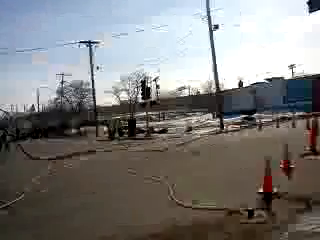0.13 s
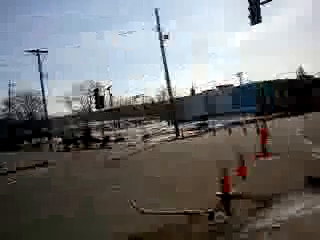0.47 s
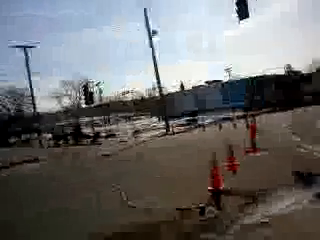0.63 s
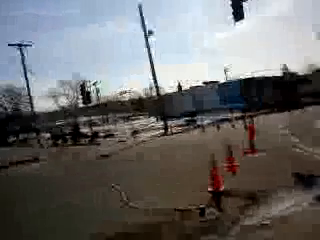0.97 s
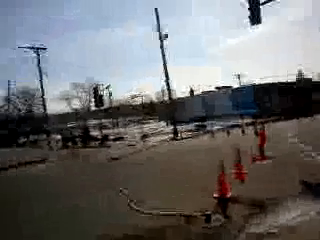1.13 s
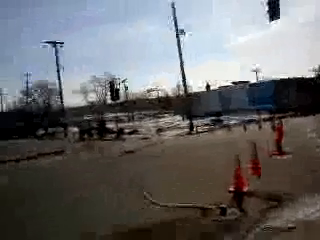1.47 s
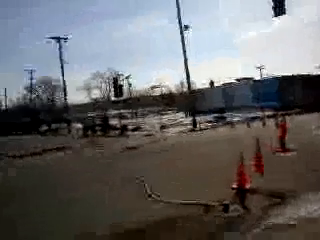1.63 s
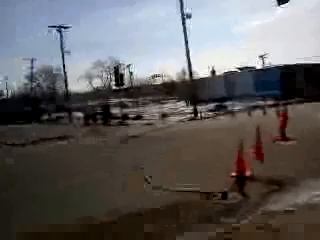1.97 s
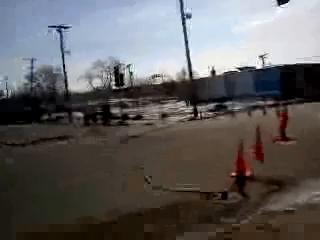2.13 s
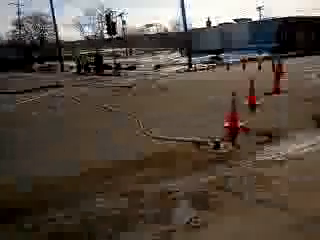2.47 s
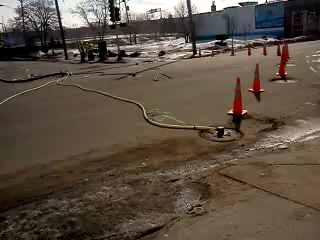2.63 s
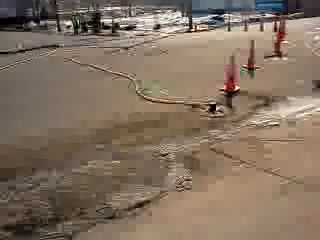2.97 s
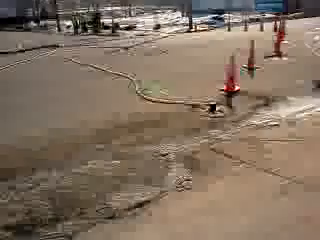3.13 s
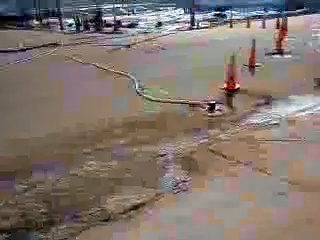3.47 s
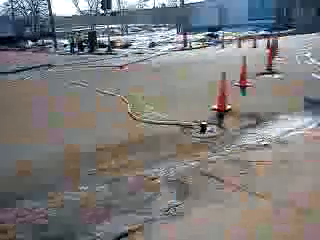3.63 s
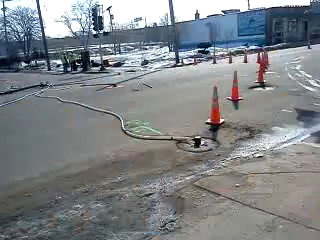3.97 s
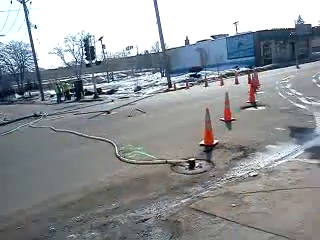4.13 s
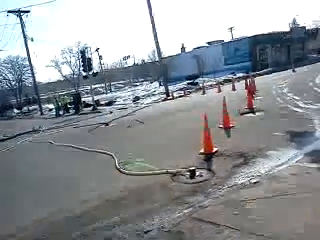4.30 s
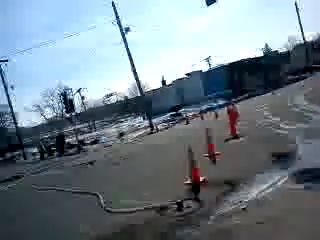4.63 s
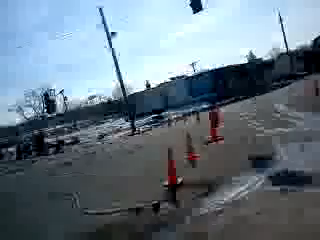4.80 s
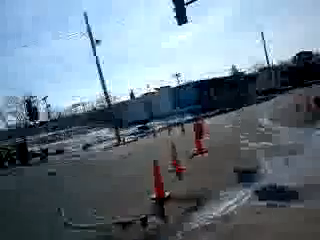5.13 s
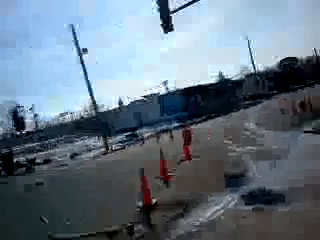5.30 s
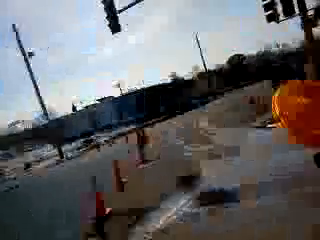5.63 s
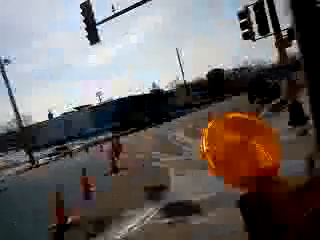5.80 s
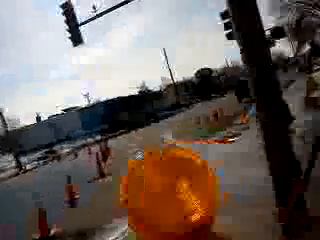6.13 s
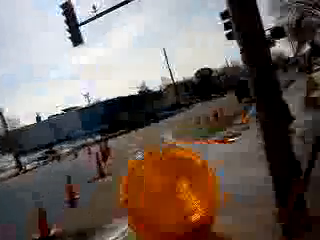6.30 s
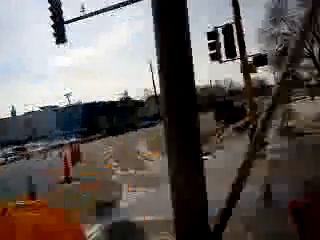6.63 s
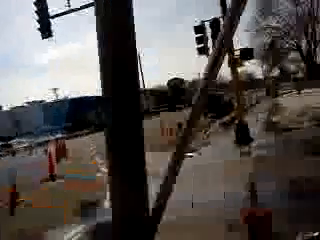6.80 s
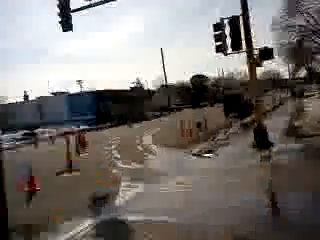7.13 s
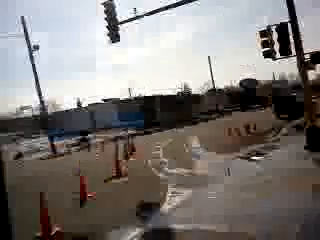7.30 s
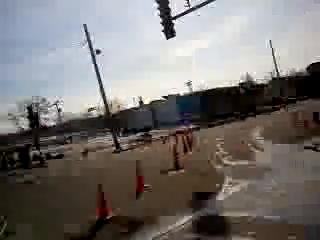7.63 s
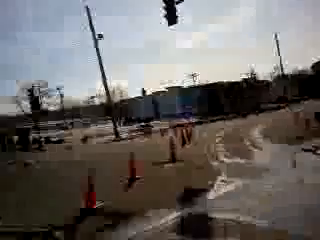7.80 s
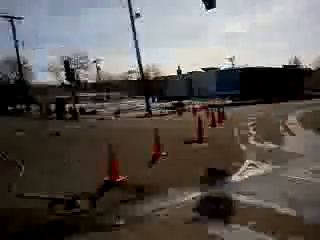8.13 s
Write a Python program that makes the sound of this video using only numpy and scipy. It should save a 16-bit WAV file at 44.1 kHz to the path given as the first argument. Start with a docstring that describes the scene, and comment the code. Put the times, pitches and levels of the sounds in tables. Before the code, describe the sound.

Loud, buzzing hollow drone of a vacuum blower across a street, wrapped in rushing air, quick engine pops, wind gusts and two dull thumps.

```python
"""A lobe blower on a truck drones across a street, over roaring air, a puttering engine and buffeting wind.
Lobe pulses give a harmonic stack of sines; shaft and gears add weaker sines locked to the same rotation.
Filtered noise makes the roar, hiss and wind; short tone bursts make the engine pops and two dull thumps.
The hand-held microphone swings round slowly, so levels follow its direction and the street echoes.
The small recorder is narrow-band and overloads on the highest peaks."""
import sys
import numpy as np
from scipy import signal
from scipy.fft import rfft, irfft
from scipy.io import wavfile

SR = 44100
rng = np.random.default_rng(int(sys.argv[2]) if len(sys.argv) > 2 else 0)


def unload_wav(signal):
    """Save mono or channel-first audio to the path in sys.argv[1] as 16-bit WAV at rate SR, clipped to [-1, 1]."""
    wavfile.write(
        sys.argv[1],
        SR,
        np.round(np.clip(np.atleast_2d(signal).T, -1, 1) * 32767).astype(np.int16),
    )


N = 364707

# moments when the lobe tones break up and a thump sounds: start_s (centre), jolt_turns, thump_level_db
BREAKS = [(6.749, .2, -8.5), (7.148, .2, -15)]


def from_db(db):
    """Logarithmic level: the amplitude gain of a level in dB."""
    return 10 ** (np.asarray(db) / 20)


def rms_one(x):
    """Normalisation: the signal scaled to an rms of 1."""
    return x / np.sqrt(np.mean(x ** 2) + 1e-20)


def in_time(rows):
    """Linear interpolation: each column of a curve table as one value a sample."""
    seconds, *columns = np.transpose(rows)
    return [np.interp(np.arange(N) / SR, seconds, column) for column in columns]


def bumps(rows):
    """Superposition of bell-shaped swells, each given as centre_s, half_length_s, height."""
    t = np.arange(N) / SR
    return sum(height * np.exp(-((t - centre) / half) ** 2) for centre, half, height in rows)


def drift(rate_hz):
    """Low-pass random process of rms 1: noise at every 40th sample through two equal poles."""
    pole = np.exp(-2 * np.pi * rate_hz * 40 / SR)
    noise = rng.standard_normal(N // 40 + 2002)
    slow = signal.lfilter([1], [1, -2 * pole, pole * pole], noise)[2000:]   # drop the settling time
    return np.interp(np.arange(N) / 40, np.arange(len(slow)), rms_one(slow))


def tone(turns, level_db, waver_db):
    """Amplitude modulation: a sine whose rms level wavers with the air between truck and microphone."""
    amplitude = np.sqrt(2) * from_db(level_db + waver_db * drift(3.5))
    return amplitude * np.cos(2 * np.pi * turns)


def break_window(centre_s):
    """Flat-topped gate: near 1 during a break, near 0 elsewhere."""
    half_s = .012
    return np.exp(-((np.arange(N) / SR - centre_s) / half_s) ** 4)


def break_up():
    """Phase modulation in turns: a jump ahead and back at each break, varied by chance at every call."""
    jolt = sum(turns * break_window(s) for s, turns, db in BREAKS)
    return jolt * (1 + .5 * drift(36.0))


def lobe_levels(away):
    """Interference: echoes cancel or reinforce single lobe tones; returns level_db by multiple."""
    # the two loudest lobe tones as the microphone swings: time_s, main_level_db, octave_level_db
    drone = [(0.0, -15.5, -11), (0.37, -15.5, -18.5), (1.59, -15, -21.5), (2.99, -16, -22.5),
             (3.31, -17, -16.5), (4.1, -16, -15), (4.54, -14.5, -18.5), (4.81, -13.5, -16.5),
             (5.57, -12.5, -14.5), (5.87, -14, -19.5), (6.63, -14.5, -16.5), (6.86, -15, -21),
             (7.21, -18.5, -20), (7.51, -16, -27), (7.83, -15, -22), (7.97, -16.5, -27),
             (8.15, -17.5, -17.5), (8.27, -12.5, -24)]
    # weaker lobe tones, as multiples of the main pitch
    side_multiples = [1.5, 2.5, 3, 3.5, 4.5]
    # one row for each of them: level_db, change_facing_away_db
    side_lobes = [(-29, -0.5), (-26, -1.5), (-20.5, -12), (-26, -4), (-33.5, -3)]
    # street echoes, one list for each of them: centre_s, half_length_s, change_db
    interference = [
        [(0.0, 0.44, -3.5), (3.05, 0.34, -13.5), (5.85, 0.2, 4), (7.3, 0.33, 4)],
        [(.7, 0.23, -6.5), (3.0, 1, 5), (4.0, 0.77, 4.5), (5.9, 0.28, -4), (8.0, 0.42, 4.5)],
        [(0.0, 0.13, -4), (1.9, 0.36, 1.5), (4.1, .3, 1.5), (7.3, 0.18, -4)],
        [(0.0, 0.12, -13), (3.85, 0.22, -4), (5.05, 0.2, -2.5), (5.5, 0.13, 4), (7.25, .2, -6)],
        [(.8, 0.94, 6), (3.0, .4, -0.5), (4.6, 0.3, 2.5), (5.9, .3, 4.5), (7.2, 0.67, -2)],
    ]
    levels = dict(zip([1, 2], in_time(drone)))
    for multiple, (db, away_db), rows in zip(side_multiples, side_lobes, interference):
        levels[multiple] = db + away_db * away + bumps(rows)
    return levels


def lobe_tones(main_turns, levels):
    """Dispersion: lobe tones leave as one pulse that the pipework spreads, the higher tones lagging."""
    # shift of the overtones by street echoes as the microphone moves: time_s, lag_turns
    overtone_lag = [(0, -.06), (.9, .04), (2.4, 0), (2.9, -.14), (4.4, -.1), (5.2, .1), (6.8, .25),
                    (8.27, .28)]
    lag_per_tone, lag_past_resonance = .17, .43   # turns per half multiple, the second past the pipe resonance
    dip_share = .4   # loss of amplitude in a break
    (echo_lag,) = in_time(overtone_lag)
    out = 0
    for multiple, level_db in levels.items():
        behind = lag_per_tone * max(2 * multiple - 3, 0)
        behind += lag_past_resonance * np.clip(2 * multiple - 5, 0, 2)
        behind = behind + echo_lag * (multiple > 1)
        out = out + tone(multiple * main_turns - behind + break_up(), level_db, waver_db=0.5)
    return out * (1 - dip_share * sum(break_window(s) for s, turns, db in BREAKS))


def shaft_lines(shaft_turns, orders, levels_db, waver_db):
    """Order-locked lines: sines at fixed multiples of the shaft speed, each starting at a random phase."""
    return sum(tone(order * shaft_turns + rng.random(), db, waver_db)
               for order, db in zip(orders, levels_db))


def blower(away):
    """Rotating-machine harmonics: lobe, shaft and gear tones all follow one shaft speed."""
    # pitch of the main lobe tone: time_s, pitch_hz
    speed = [(0.1, 372.7), (0.5, 373.2), (1.1, 373.6), (1.5, 373.35), (2.3, 373.2), (2.72, 375.1),
             (3.0, 375.05), (3.35, 374.6), (3.7, 373.5), (4.15, 372.9), (5.8, 372.75), (6.1, 372.5),
             (7.1, 372.35), (8.2, 372.8)]
    # lines beside the tone at 36 times shaft speed, from once-a-turn unevenness: shaft_multiple
    beside_orders = [37, 38]
    # their levels against that tone: level_db
    beside_db = [-9, -18]
    # weaker lines locked to the shaft: shaft_multiple
    shaft_orders = [6, 7, 8.5, 9, 10.5, 15, 48, 60, 61, 63, 66, 69, 72, 74, 75, 76, 78, 84, 87, 90, 93, 96,
                    102, 126, 129]
    # their levels before shading: level_db
    shaft_db = [-37, -39, -40, -31, -35, -39, -45, -39, -45, -44, -41, -45, -38, -39, -38, -45, -46, -43,
                -43, -42, -47, -47, -48, -51, -51]
    # gear whine near the casing resonance: shaft_multiple
    gear_orders = [50.5, 51.82, 52.88, 57, 58]
    # their levels against the whine curve: level_db
    gear_db = [-15, -11, 0, -11, -3]
    # level of the gear whine: time_s, level_db
    whine = [(0, -27.5), (1.55, -26.5), (2.45, -31.5), (3.05, -36.5), (3.5, -31.5), (4.55, -29), (5.8, -28),
             (6.4, -44.5), (7.2, -41), (7.55, -35), (7.85, -34.5), (8.27, -34)]
    (main_hz,), (whine_db,) = in_time(speed), in_time(whine)
    main_turns = np.cumsum(main_hz) / SR
    shaft_turns = main_turns / 12   # the main tone is at twelve times the shaft speed
    levels = lobe_levels(away)
    shading_db = -4 * (away - .3)   # shaft lines are shaded facing away
    out = lobe_tones(main_turns, levels)
    out += shaft_lines(shaft_turns, beside_orders, [levels[3] + db for db in beside_db], waver_db=1.0)
    out += shaft_lines(shaft_turns, shaft_orders, [db + shading_db for db in shaft_db], waver_db=2.0)
    return out + shaft_lines(shaft_turns, gear_orders, [whine_db + db for db in gear_db], waver_db=1.0)


def roar(levels):
    """Turbulence noise: one coloured noise split into overlapping ranges that swell apart."""
    # colour of the roar: frequency_hz, density_db (per Hz)
    colour = np.array([(60, -20), (150, -5), (300, 0), (420, -1), (650, -4), (1150, -5), (1450, -8),
                       (2000, -8), (3000, -9), (3550, -11.5), (3700, -13), (4640, -15), (4740, -19),
                       (5400, -19.5)])
    # casing resonances lifting the roar: frequency_hz, width_hz, lift_db
    casing = [(1704, 100, 2.5), (2315, 250, 4), (2820, 120, 3)]
    # ranges in which the level is set: low_hz, high_hz
    ranges_hz = [(160, 520), (580, 1280), (1350, 1950), (1950, 3000), (3050, 3600), (3700, 4650)]
    hz = np.fft.rfftfreq(N, 1 / SR) + 1   # +1 keeps the logarithm finite
    colour_db = np.interp(np.log(hz), np.log(colour[:, 0]), colour[:, 1])
    for peak_hz, width_hz, lift_db in casing:
        colour_db = colour_db + lift_db / (1 + (2 * (hz - peak_hz) / width_hz) ** 2)
    spectrum = rfft(rng.standard_normal(N)) * from_db(colour_db)
    out = 0
    for (low, high), level_db, row in zip(ranges_hz, levels, np.eye(len(levels))):
        share = np.interp(hz, np.mean(ranges_hz, axis=1), row)   # triangular crossfade to the neighbours
        inside = spectrum[(hz > low) & (hz < high)]
        range_rms = np.sqrt(2 * np.sum(abs(inside) ** 2)) / N
        out = out + from_db(level_db + 0.61 * drift(4.0)) * irfft(spectrum * share, N) / range_rms
    return out


def putter():
    """Periodic impulse excitation: each engine firing is a short hollow pop of two tones a fifth apart."""
    # the pops before chance: time_s, peak_level_db (of the upper tone), pitch_hz
    pops = [(0, -32, 700), (2.3, -30, 650), (2.65, -22, 680), (2.85, -20, 830), (3.55, -22, 840),
            (3.8, -27, 620), (4.05, -20.5, 620), (4.67, -20, 660), (4.74, -18.5, 850), (4.9, -19, 860),
            (5.0, -21, 1000), (5.9, -22, 1010), (6.1, -23, 1230), (6.4, -25, 1220), (6.55, -28, 1450),
            (7.1, -28, 1550), (8.27, -36, 1600)]
    first_s, period_s, half_s = .1055, .07858, .006
    level_spread_db, pitch_spread = 2, .04   # the second as a share of the pitch
    db, hz = in_time(pops)
    span = np.arange(-800, 800)
    envelope = np.exp(-(span / SR / half_s) ** 2)
    out = np.zeros(N + 1600)   # 800 samples of margin at both ends
    starts = (np.arange(first_s, N / SR, period_s) * SR).astype(int)
    for i in starts:
        pitch_chance, upper_phase, lower_phase, level_chance = rng.standard_normal(4)
        turns = hz[i] * (1 + pitch_spread * pitch_chance) * span / SR
        pop = np.cos(2 * np.pi * (turns + upper_phase))
        pop += 0.6 * np.cos(2 * np.pi * (.66 * turns + lower_phase))   # weaker, about a fifth below
        out[i + 800 + span] += from_db(db[i] + level_spread_db * level_chance) * envelope * pop
    return out[800:N + 800]


def break_thump():
    """Modal superposition: a dull thump at each break from three short soft tones in quick succession."""
    # tones of a thump: pitch_hz, level_db, delay_s (after the break)
    thump_modes = [(410, 0, -.007), (1030, -3.5, .001), (760, 0, .007)]
    t, out = np.arange(N) / SR, 0
    for s, turns, db in BREAKS:
        for hz, mode_db, late_s in thump_modes:
            swell = np.exp(-((t - s - late_s) / .005) ** 2)
            out = out + from_db(db + mode_db) * swell * np.cos(2 * np.pi * (hz * t + rng.random()))
    return out


def band_noise(order, low_hz, high_hz):
    """Band-pass filtering: white noise narrowed to a band and scaled to rms 1."""
    sos = signal.butter(order, [low_hz, high_hz], "band", fs=SR, output="sos")
    return rms_one(signal.sosfilt(sos, rng.standard_normal(N)))


def wind():
    """Pressure fluctuation at the microphone: lumpy low noise, with harder buffets that reach higher."""
    # strength of the breeze before its lumps: time_s, level_db
    breeze = [(0, -39.5), (1.0, -39.5), (1.9, -36.5), (2.6, -32.5), (4.2, -36), (4.9, -31), (5.25, -28.5),
              (5.5, -40), (7.3, -43), (8.27, -39.5)]
    # single buffets: centre_s, half_length_s, lift_db (above the breeze)
    buffets = [(.48, 0.063, 9.5), (2.16, 0.086, 4), (2.37, 0.049, 2), (2.88, .05, 7), (3.2, 0.042, 5),
               (3.5, .05, 7), (4.37, .04, 11), (4.64, .03, 5.5), (4.79, 0.035, 6), (5.045, .01, 6),
               (5.12, .01, 2), (5.21, .01, 2.5), (6.96, .04, 7), (7.14, .04, 12), (7.5, 0.022, 6),
               (7.8, 0.073, 3)]
    level_db = in_time(breeze)[0] + 3.1 * drift(7.7)
    buffet_db = bumps(buffets)
    low = from_db(level_db + buffet_db) * band_noise(1, 40, 180)
    # the brighter part is weaker but grows faster in a buffet
    top = from_db(level_db - 6.5 + 1.4 * buffet_db) * band_noise(1, 150, 420)
    return low + top


def other_machines():
    """Harmonic series: a second machine's thin hum further off, and a low engine note, both at fixed pitch."""
    # level of the hum: time_s, level_db
    hum_curve = [(0, -50), (4.4, -50), (5.0, -34.5), (6.5, -38.5), (8.27, -29.5)]
    # its partials 1, 2, 3 ... against that level: level_db
    hum_partials_db = [-2, -5.5, -11.5, -7.5, -9, -4]
    # the idling engine: pitch_hz, level_db
    idle_lines = [(72.7, -49), (145.4, -43), (218, -49), (264, -46.5)]
    hum_hz = 473.6
    t, (hum_db,) = np.arange(N) / SR, in_time(hum_curve)
    hum = sum(tone(k * hum_hz * t + rng.random(), hum_db + db, waver_db=2.0)
              for k, db in enumerate(hum_partials_db, start=1))
    idle = sum(tone(hz * t + rng.random(), db, waver_db=1.5) for hz, db in idle_lines)
    return hum + idle


def hiss_patches():
    """Gated band noise: the hiss swells briefly in narrow bands that fade in and out."""
    # the patches: centre_s, half_length_s, frequency_hz, level_db
    patches = [(.2, .15, 3500, -38), (0.943, 0.23, 3200, -34), (4.2, .15, 3260, -38.5),
               (4.881, 0.17, 3780, -33), (6.097, 0.16, 4500, -35), (6.952, 0.22, 2880, -37),
               (7.78, 0.15, 3360, -31.5)]
    t, out = np.arange(N) / SR, 0
    for s, half, hz, db in patches:
        swell = np.exp(-((t - s) / half) ** 2)
        out = out + from_db(db) * swell * band_noise(2, hz - 220, hz + 220)
    return out


def scene():
    """Linear superposition of every source at the microphone, as one channel."""
    # how far the microphone faces away from the truck: time_s, share (0-1)
    facing_away = [(0, 0.07), (4.3, 0.08), (4.9, 0.26), (6, 0.6), (6.7, 0.5), (7.25, 0.92), (7.7, 0.7),
                   (8.27, 0.75)]
    # swing of the treble roar, felt by the ranges according to their share: time_s, level_db
    treble = [(0, 1), (.3, 2.5), (.8, -0.5), (1.8, 1.5), (2.7, .5), (3.05, -2.5), (3.7, -2), (4.6, 2),
              (5.1, 0.5), (5.5, 0), (6.3, 1), (7.0, -1), (7.7, 1), (8.27, -3.5)]
    # the roar in each range: level_db, change_facing_away_db, treble_share
    roar_levels = [(-27.5, 2, 0.2), (-26, -5.5, -0.5), (-28, -2.5, 0.68), (-28, 1, .3), (-34, -1.5, 1),
                   (-36.5, 3.5, 0.86)]
    away = np.clip(in_time(facing_away)[0], 0, 1)
    (treble_db,) = in_time(treble)
    roar_db = [db + away_db * away + share * treble_db + 0.7 * drift(0.6)   # with a slow swell of its own
               for db, away_db, share in roar_levels]
    machine = blower(away) + roar(roar_db) + putter() + break_thump()
    return (machine + wind() + other_machines() + hiss_patches())[None]


def record(dry):
    """Sampling and overload: quarter-rate samples interpolated with a faint mirror band, then hard clipping."""
    narrow_hz, overload, cutoff_hz = 5345, .712, 15900   # overload is the clipping amplitude
    narrow = signal.sosfilt(signal.ellip(14, .3, 60, narrow_hz, fs=SR, output="sos"), dry)
    sparse = narrow * 4 * (np.arange(N) % 4 == 0)   # every fourth sample, level made up
    interpolator = signal.firwin(121, SR / 8, window=("kaiser", 9), fs=SR)
    smooth = signal.fftconvolve(sparse, interpolator[None], "same")
    clipped = np.clip(smooth, -overload, overload)
    return signal.sosfilt(signal.ellip(10, .1, 70, cutoff_hz, fs=SR, output="sos"), clipped)


dry = scene()
out = record(dry)
unload_wav(out)
```